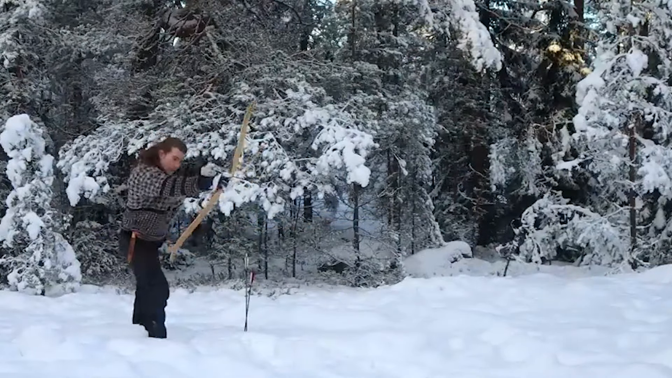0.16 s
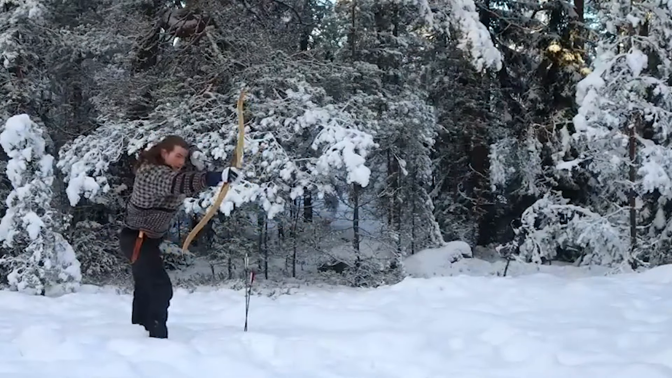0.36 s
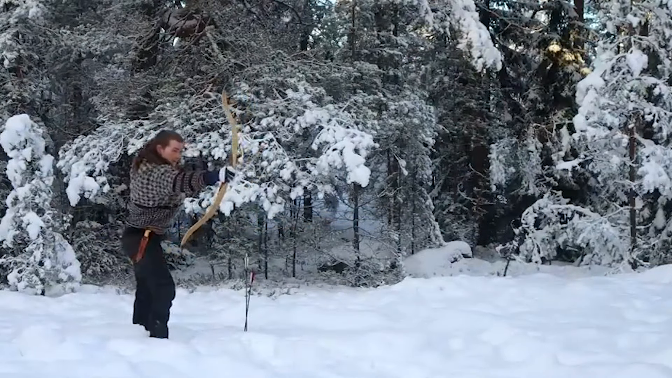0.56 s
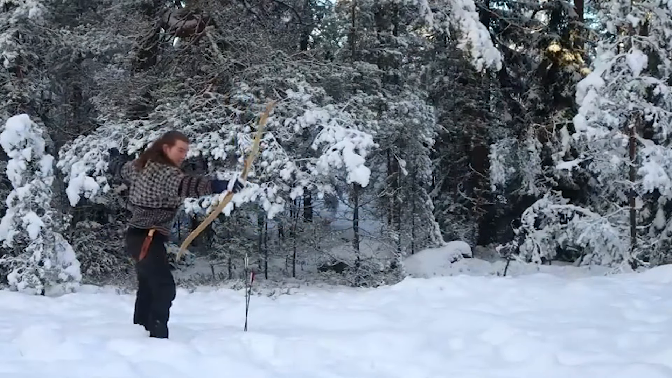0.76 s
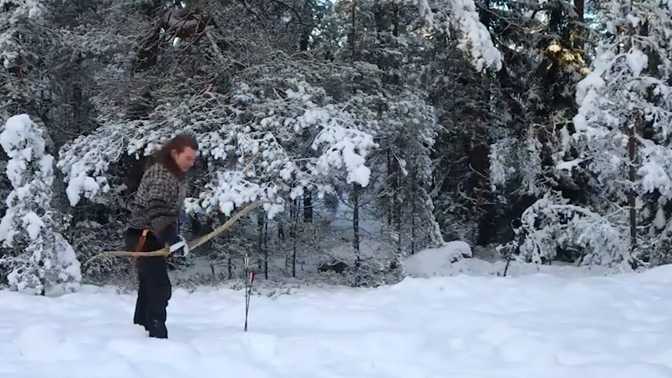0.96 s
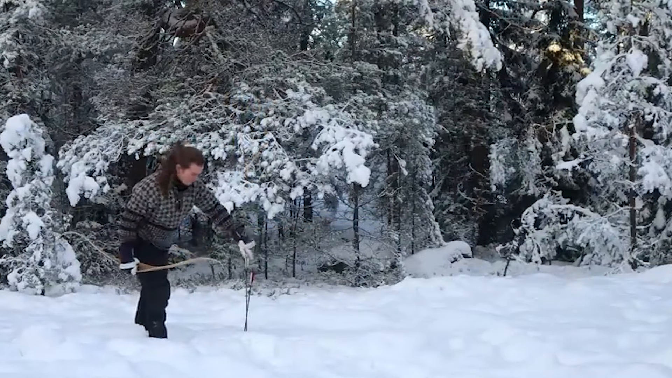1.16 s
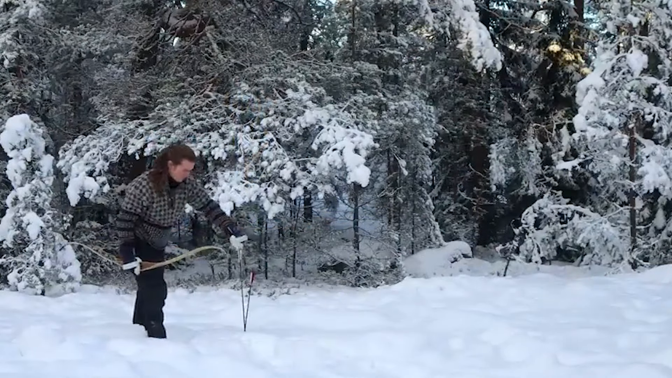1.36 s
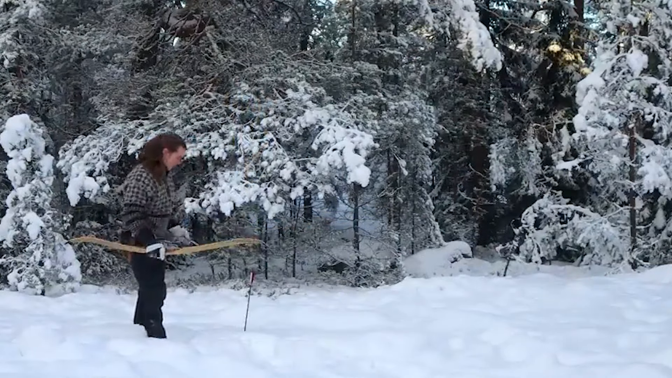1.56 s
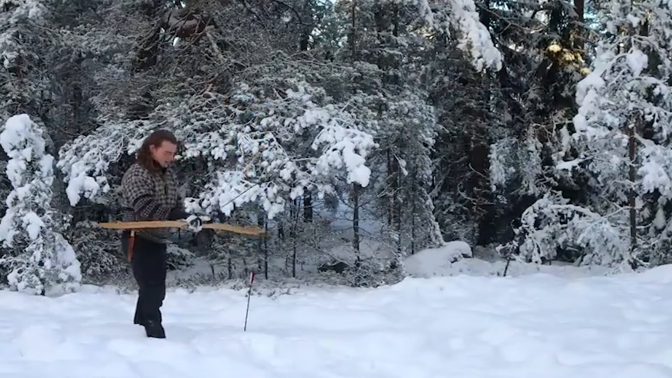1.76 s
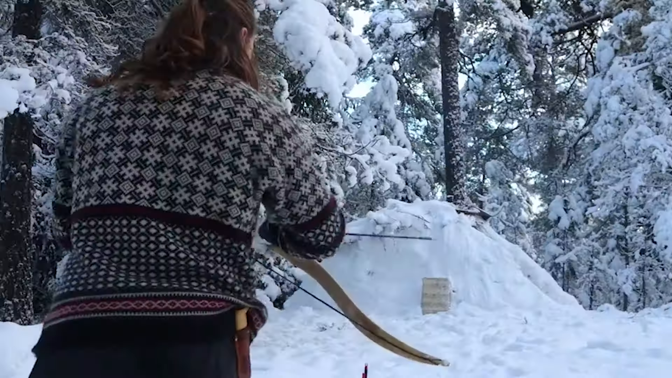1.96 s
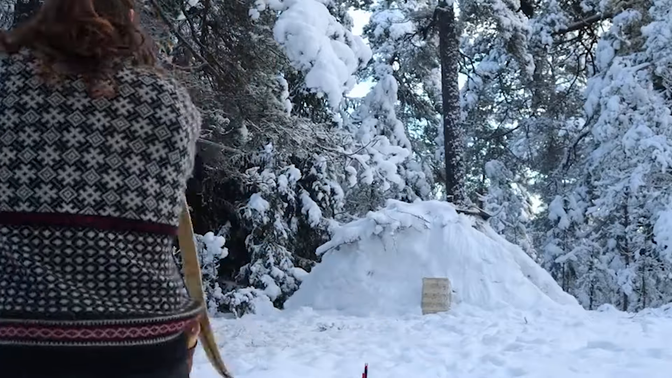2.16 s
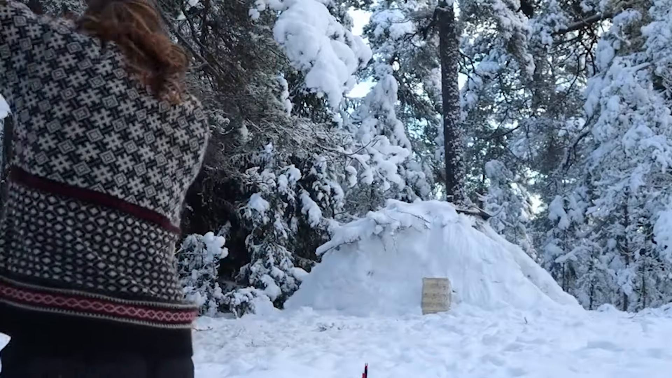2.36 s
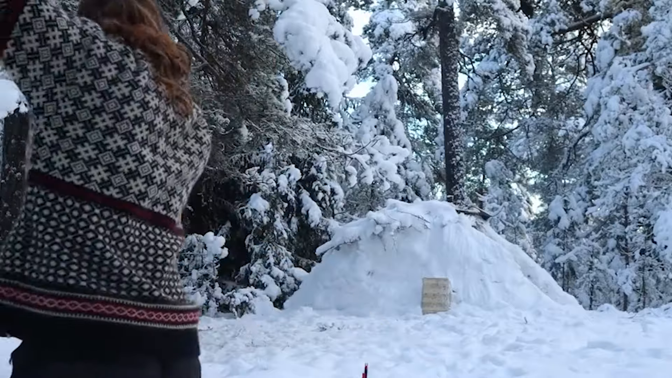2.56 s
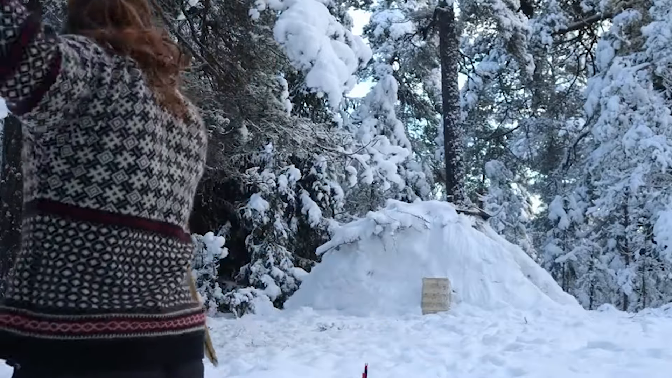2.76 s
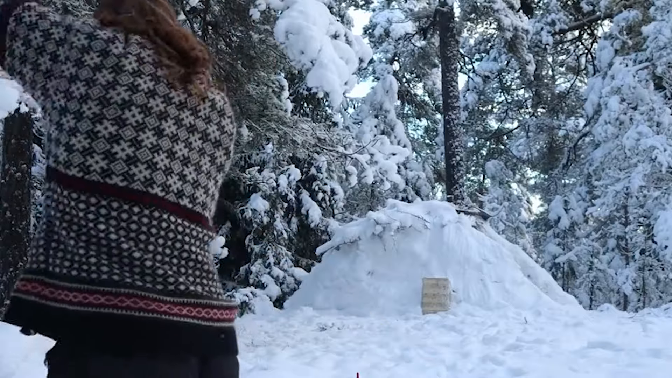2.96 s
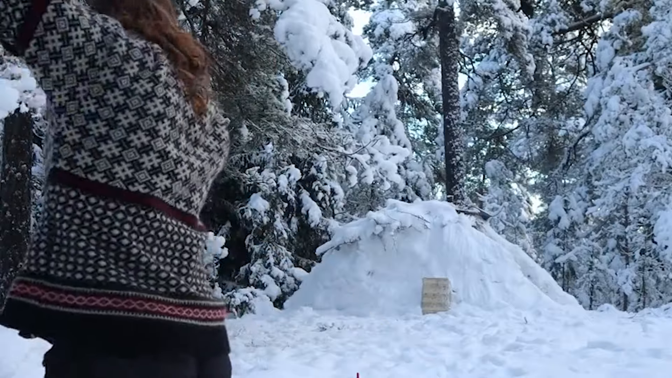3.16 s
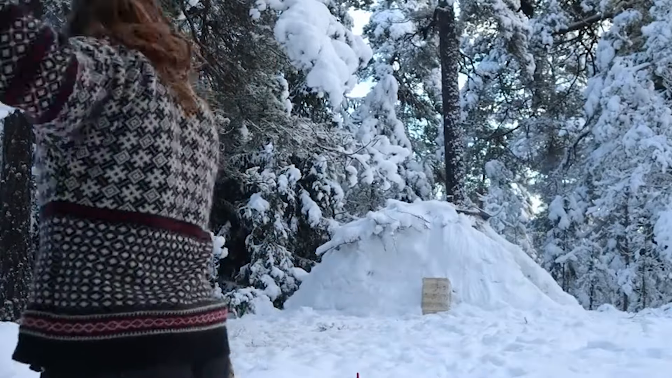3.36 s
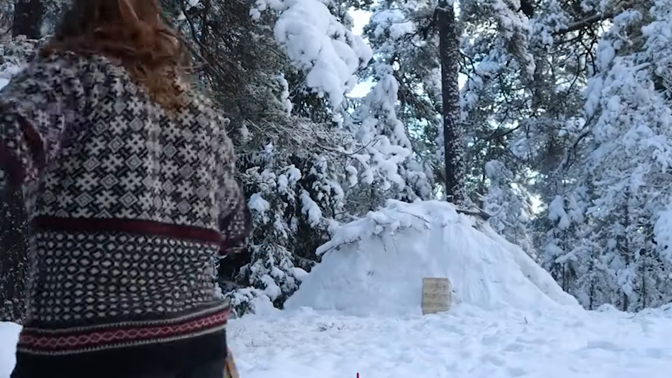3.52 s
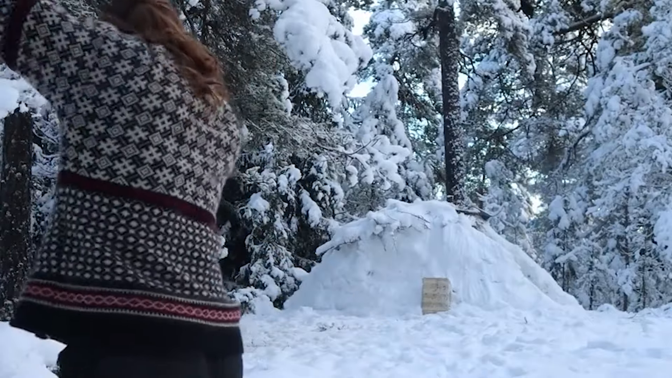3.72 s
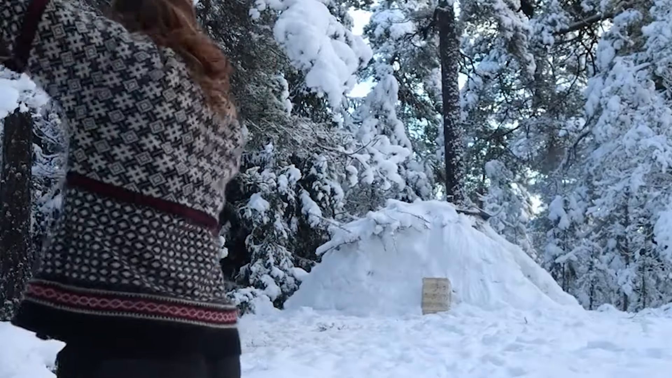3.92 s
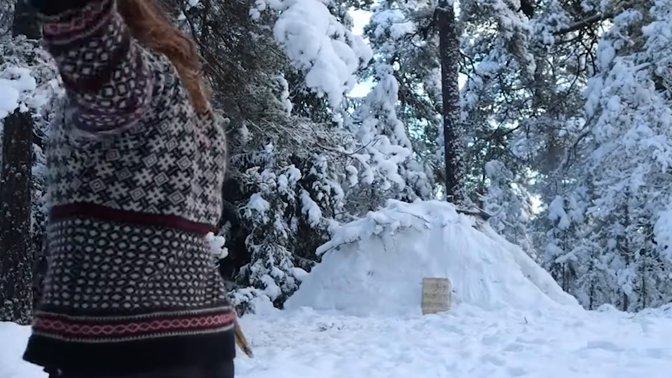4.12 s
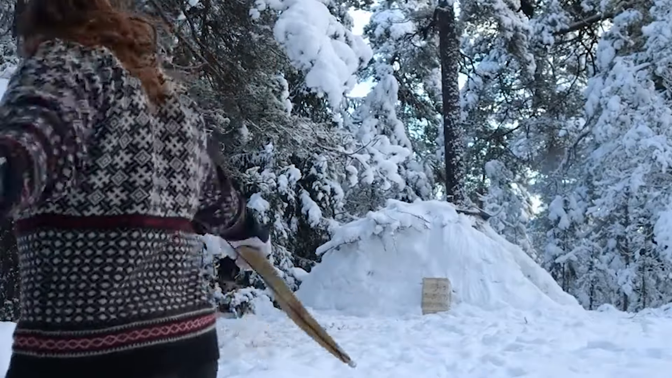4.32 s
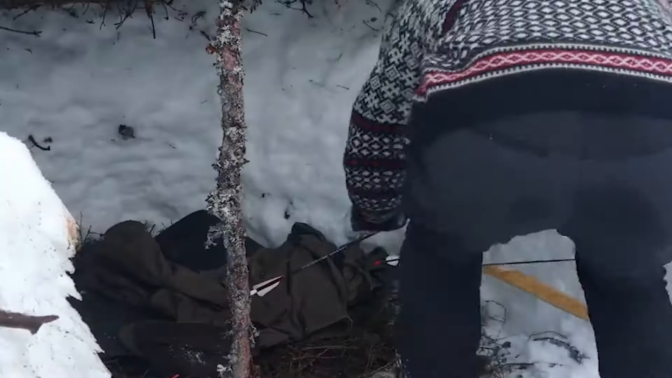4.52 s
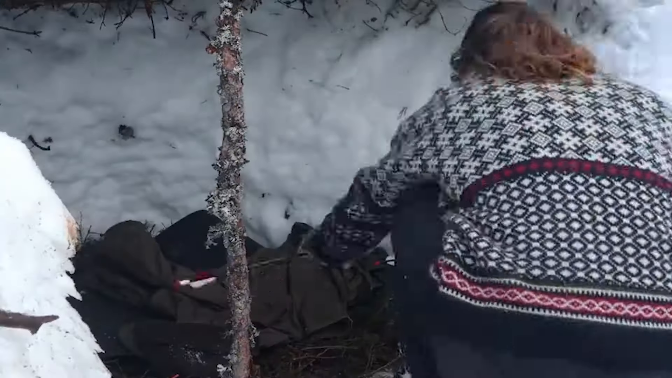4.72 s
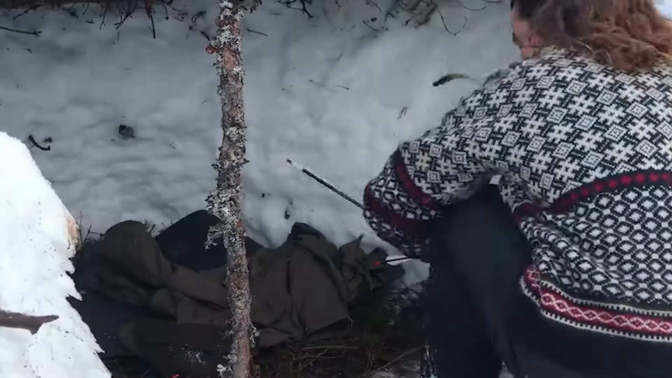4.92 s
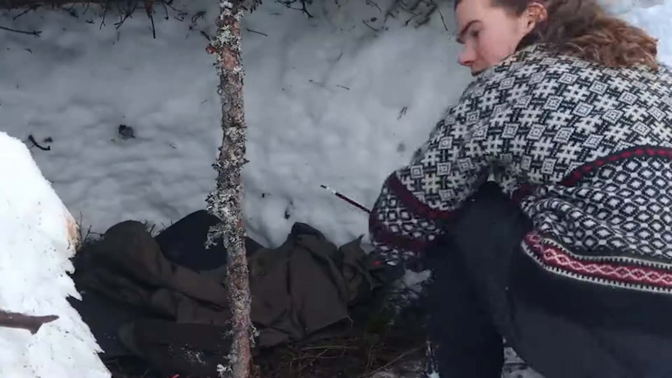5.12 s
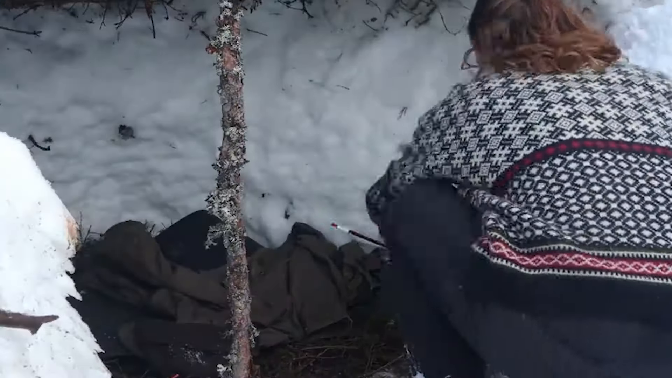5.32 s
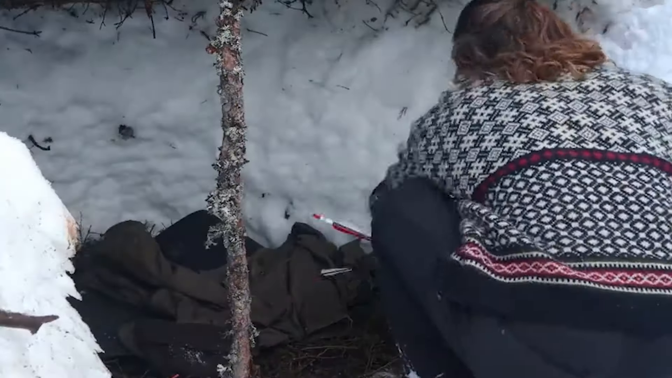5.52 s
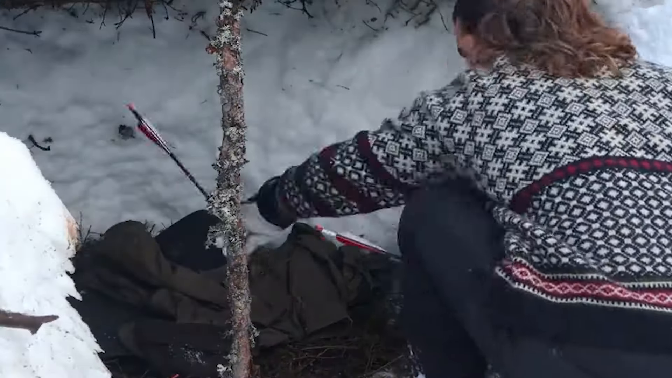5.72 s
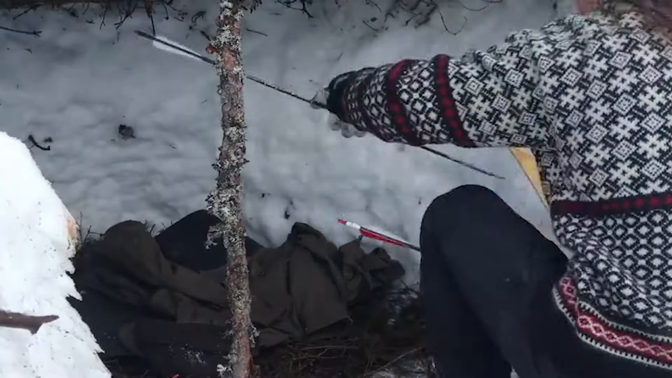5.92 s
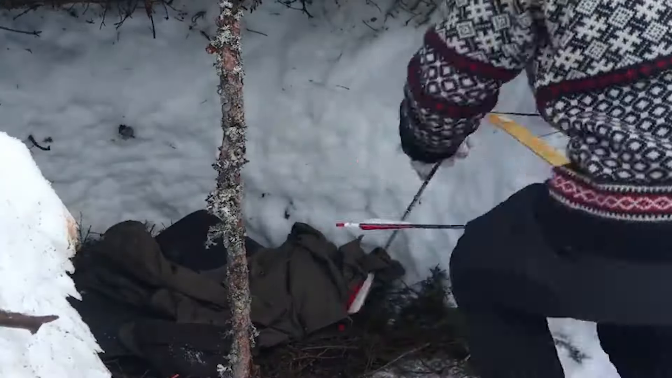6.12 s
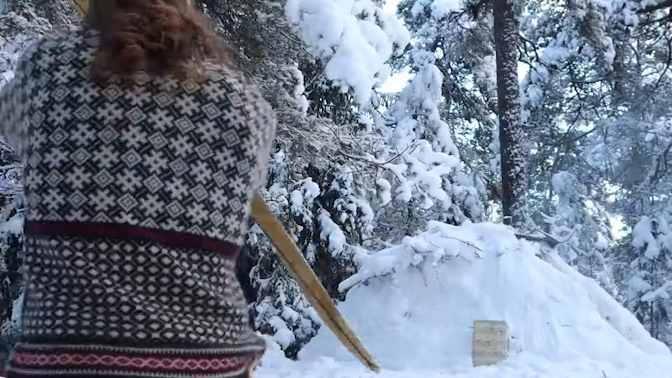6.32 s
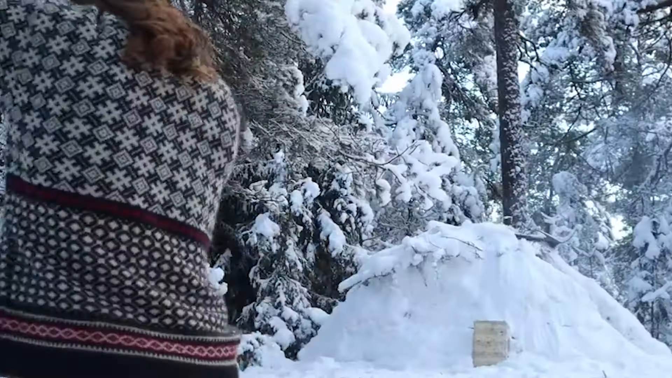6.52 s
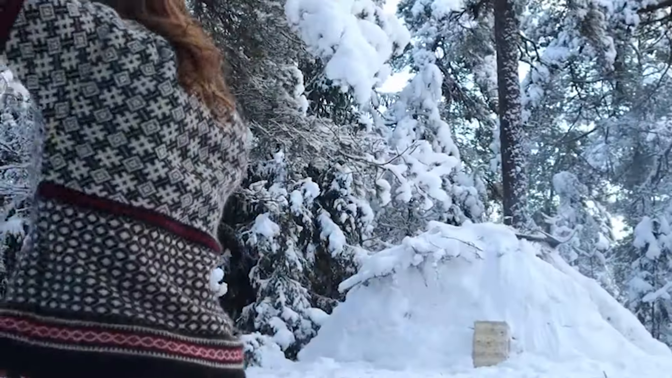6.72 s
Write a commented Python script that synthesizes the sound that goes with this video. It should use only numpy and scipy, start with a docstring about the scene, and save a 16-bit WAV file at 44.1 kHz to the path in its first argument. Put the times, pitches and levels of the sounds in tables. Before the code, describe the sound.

An archer's bow snaps and arrows thud into a target across still snow, broken by close rustling and clacking as shafts are collected.

```python
"""A snowy forest: an archer looses four arrows, the first in a glade, and gathers arrows in a snow shelter.
Each shot is three slaps of noise that leave the modes of the bow ringing; each arrow lands as three
crunches with a dull knock of the target. Sparse random reflections from the trees scatter both back.
Between shots nocks click, shafts clack, wool and snow rustle as grainy noise, and faint low wind
touches the microphone over the still air of each place."""
import sys
import numpy as np
from scipy import signal
from scipy.fft import rfft, irfft, next_fast_len
from scipy.io import wavfile
from scipy.ndimage import uniform_filter1d

SR = 44100
rng = np.random.default_rng(int(sys.argv[2]) if len(sys.argv) > 2 else 0)


def dump_mix(stems):
    """Bounce the given channels to the path in sys.argv[1] as a 16-bit WAV at rate SR."""
    frames = np.atleast_2d(stems).T  # one column per channel
    limited = np.clip(frames, -1, 1)  # hard clip at full scale
    pcm = np.round(limited * 32767).astype(np.int16)
    wavfile.write(sys.argv[1], SR, pcm)


N = 298998
TIME = np.arange(N) / SR

# Where we listen, in order: glade, range, shelter, range. Each row: start in seconds, end in seconds.
PLACE_SPANS = [(0, 1.85), (1.85, 4.385), (4.385, 6.29), (6.29, 7)]


def amp(db):
    """Decibels to gain."""
    return 10 ** (np.asarray(db) / 20)


def unit(x):
    """Scales to rms 1."""
    return x / np.sqrt(np.mean(x ** 2) + 1e-20)


def read(points, hz):
    """Reads a curve of (Hz, value) points on a log-frequency axis."""
    f, value = np.transpose(points)
    return np.interp(np.log(hz + 1), np.log(f + 1), value)


def add(mix, s, sound):
    """Mixes a sound in at time s."""
    part = mix[max(round(s * SR), 0):][:len(sound)]
    part += sound[:len(part)]


def during(start, end):
    """A soft-edged switch that is on between two times."""
    return uniform_filter1d(1. * ((TIME >= start) & (TIME < end)), size=400)


def tilted(points, tilt_db):
    """Leans a spectrum around 1 kHz by so many dB per octave."""
    return [(f, db + tilt_db * np.log2(f / 1000)) for f, db in points]


def hump(hz, db):
    """A spectrum with one broad rise around hz."""
    return [(hz / 2, 0), (hz / 2 ** .5, db / 2), (hz, db), (hz * 2 ** .5, db / 2), (hz * 2, 0)]


def shaped(x, *spectra):
    """Colours a signal by the sum of some dB spectra, with a minimum-phase filter, keeping its energy."""
    size = next_fast_len(len(x) + 2048)
    hz = abs(np.fft.fftfreq(size, 1 / SR))
    gain_db = np.maximum(sum(read(points, hz) for points in spectra), -100)
    log_gain = np.log(amp(gain_db))
    # the Hilbert transform of the log gain gives the phase that puts no sound ahead of its cause
    response = np.exp(np.conj(signal.hilbert(log_gain)))
    y = np.fft.ifft(np.fft.fft(x, size) * response).real
    return y * np.linalg.norm(x) / np.linalg.norm(y)


def noise(spectrum):
    """Steady coloured noise of about rms 1."""
    return shaped(rng.standard_normal(N), spectrum)[:N]


def patchy(x, depth_db):
    """Lets the colour of a noise wander from moment to moment."""
    z = signal.stft(x, SR, nperseg=256)[2]
    field = uniform_filter1d(rng.standard_normal(z.shape), size=7, axis=0)
    field = uniform_filter1d(field, size=5, axis=1)
    return signal.istft(z * amp(depth_db * unit(field)), SR, nperseg=256)[1][:len(x)]


def burst(db, t60, *spectra):
    """A brief dense crunch of contact with a sharp start, even in spectrum before it is coloured."""
    t60 = np.clip(t60, .001, .12)
    t = np.arange(int(t60 * SR)) / SR
    attack = 1 - np.exp(-t / (.012 * t60))
    fade = amp(-60 * t / t60) * attack
    fade_rms = np.sqrt(np.mean(fade ** 2))
    x = rng.standard_normal(SR // 8)[:len(t)]
    # no single pitch stands out of the crunch, and no single sample out of its fade
    for _ in range(3):
        flat = irfft(np.exp(1j * np.angle(rfft(x * fade))), len(t))
        x = np.clip(unit(flat) * fade_rms / (fade + 1e-6), -2, 2)
    return amp(db) * shaped(unit(x * fade) * fade_rms, *spectra)


def ring(modes, tilt_db, rise):
    """Dying modes of a struck body; their starting heights have a joint size of 1."""
    hz, db, t60 = np.transpose(modes)[:, :, None]
    t = np.arange(SR // 3) / SR
    height = amp(db + tilt_db * np.log2(hz))
    phase = 2 * np.pi * (hz * t + rng.random(hz.shape))
    waves = np.sin(phase) * amp(-60 * t / t60)
    onset = 1 - np.exp(-t / rise)
    return (height * waves).sum(0) / np.linalg.norm(height) * onset


def blows(table, colour):
    """Hard contacts, each with its own balance of thump, knock and crack."""
    out = np.zeros(N)
    for s, db, t60, low, knock, mid, top in table:
        balance = [(150, low), (800, knock), (1800, mid), (4200, 0), (11000, top)]
        add(out, s, burst(db, t60, colour, balance))
    return out


def clicks(table, modes, ring_db, tick_db, tick_t60):
    """A tick of contact and the short ring of the part that was hit."""
    # Hard tip on hard shaft. Each row: frequency in Hz, level in dB.
    click_colour = [(100, -39), (900, -38), (1600, -6), (3000, 2.5), (6000, -4), (10000, -6), (16000, -9)]
    out = np.zeros(N)
    for s, db, tilt_db in table:
        add(out, s, amp(db + ring_db) * ring(modes, tilt_db, rise=.0001))
        add(out, s, burst(db + tick_db, tick_t60, tilted(click_colour, tilt_db)))
    return out


def still_air():
    """The quiet of each place is steady noise of its own colour."""
    # Colour of the air in glade, range and shelter. Each row: frequency in Hz, relative level in dB per Hz.
    glade = [(15, -66), (25, -34), (161, -6), (229, -9), (263, -5.5), (545, -7.5), (818, -4.5),
             (1190, -6.5), (1940, -15), (3080, -22), (3720, -23), (8590, -30), (9840, -29.5),
             (10700, -28.5), (16000, -32.5)]
    open_range = [(15, -22), (30, -8), (80, -14.5), (150, -10), (354, -10.5), (575, -8.5), (796, -7),
                  (950, -10.5), (1190, -8), (1700, -11.5), (2610, -13.5), (5880, -19.5), (10100, -24),
                  (16000, -26)]
    shelter = [(15, -53), (25, -31), (80, -15), (195, -2.5), (335, -0.5), (560, -3), (887, -3),
               (1190, -7.5), (1330, -6), (2840, -10), (5570, -8.5), (14800, -14.5), (16000, -14)]
    range_db = -53
    beds = [(glade, -49), (open_range, range_db), (shelter, -49), (open_range, range_db)]
    return sum(during(*span) * amp(db) * noise(colour) for span, (colour, db) in zip(PLACE_SPANS, beds))


def faint_tones():
    """Narrow bands of noise hang in the air as faint tones."""
    # Each row: start in seconds, end in seconds, pitch in Hz, width in Hz, level in dB.
    tone_table = [(0, 1.85, 260, 6, -62), (1.85, 7, 592, 8, -70), (4.385, 7, 1175, 20, -67),
                  (0, 1.85, 9850, 220, -69), (1.85, 7, 9950, 320, -72)]
    out = np.zeros(N)
    bins = np.fft.rfftfreq(N, 1 / SR)
    for start, end, hz, width, db in tone_table:
        band = np.exp(-2 * ((bins - hz) / width) ** 2)
        tone = irfft(rfft(rng.standard_normal(N)) * band, N)
        out += during(start, end) * amp(db) * unit(tone)
    return out


def wind(trim_db=-1):
    """Lumpy low noise of wind at the microphone, heard only on the range."""
    # Strength of the wind in both stays on the range, the first one as a list of stretches.
    # Each row: time in seconds, level in dB before the common trim.
    early_wind = np.vstack([
        [(2.3, -78), (2.424, -61), (2.626, -71), (2.64, -60)],
        [(2.8, -80), (2.91, -48), (2.996, -60), (3.27, -47)],
        [(3.42, -54), (3.446, -58), (3.894, -68), (3.93, -79)],
        [(4.07, -54.5), (4.218, -64), (4.31, -53), (4.38, -63)],
    ])
    late_wind = [(6.3, -61), (6.558, -67), (6.77, -59)]
    # Each row: frequency in Hz, level in dB.
    wind_colour = [(20, -12), (50, -7), (78, -0.5), (105, -5), (150, -4), (230, -11), (400, -31),
                   (1000, -70)]
    gusts = np.zeros(N)
    for curve in (early_wind, late_wind):
        strength = amp(np.interp(TIME, *np.transpose(curve)))
        gusts += during(curve[0][0], curve[-1][0]) * strength
    return amp(trim_db) * gusts * noise(wind_colour)


def forest(x, build_up=0.012, trunks_per_s=5000):
    """Many small reflections from trunks and boughs; the snow soaks them up quickly."""
    # Colour of the echo. Each row: frequency in Hz, level in dB.
    echo_colour = [(100, -13), (400, 0.5), (900, -1), (2000, -1.5), (4000, -4.5), (8000, 1.5),
                   (16000, -0.5)]
    # Decay of the echo. Each row: frequency in Hz, t60 in seconds.
    echo_t60 = [(100, 0.18), (1000, 0.17), (4000, 0.23), (8000, 0.16), (16000, 0.14)]
    t = np.arange(SR // 2) / SR
    reflections = rng.standard_normal(len(t)) * (rng.random(len(t)) < trunks_per_s / SR)
    hz, age, z = signal.stft(reflections, SR, nperseg=256)
    decay_db = 60 * age / read(echo_t60, hz)[:, None]
    z = z * amp(read(echo_colour, hz)[:, None] - decay_db)
    tail = signal.istft(z, SR, nperseg=256)[1][:len(t)]
    tail = tail * (1 - np.exp(-(t / build_up) ** 2))
    return signal.fftconvolve(x, tail / np.linalg.norm(tail))[:N]


def tree_wall(x, delay=0.023, t60=0.18, db=-12, boughs_per_s=2500, build_up=0.0022):
    """In the glade a close wall of spruces returns the strike as a second, later splash."""
    out = np.zeros(N)
    t = np.arange(SR // 4) / SR
    boughs = rng.standard_normal(len(t)) * (rng.random(len(t)) < boughs_per_s / SR)
    colour = [(150, -6), (380, 1), (800, -21), (1500, -1), (3100, 3.5), (3750, 9.5),
              (4400, -1.5), (6500, -2.5), (16000, 3)]  # (Hz, dB)
    scatter = shaped(boughs * amp(-60 * t / t60) * (1 - np.exp(-t / build_up)), colour)
    in_glade = x * during(*PLACE_SPANS[0])
    add(out, delay, signal.fftconvolve(in_glade, scatter / np.linalg.norm(scatter)))
    return amp(db) * out


def rubbing(grains_per_s=1200, spread_db=3.0, smooth_share=0.89, clump_db=2):
    """Sleeve, arrow or snow strokes: fibres and ice grains slip in clumps over a soft hiss."""
    # Each row: start in seconds, length in seconds, level in dB midway through the swell,
    # swell from start to end in dB, tilt in dB per octave.
    strokes = [(0.249, .3, -59, 14, -1.5), (2.041, 0.16, -43, -8, -4.5), (2.233, 0.15, -45, -11.5, -3),
               (2.484, 0.041, -51, -2, -3), (3.063, 0.11, -54.5, -11, -2), (3.617, .23, -58, 17, -4.5),
               (4.383, 0.03, -34, -7, -1.5), (4.421, 0.061, -36, 14, 1.5), (4.54, 0.091, -31.5, 4.5, 0),
               (4.641, .045, -31.5, -6, 0.5), (4.722, 0.022, -44.5, 3, 1), (4.812, 0.027, -43, 7, -1),
               (4.852, 0.039, -36, -5, 1), (5.018, 0.017, -40.5, 0, -2), (5.3, 0.048, -39, -7, -.5),
               (5.467, 0.042, -41.5, 7, 3), (5.651, 0.042, -36.5, 10, 2.5), (5.951, 0.021, -39.5, 9, -2.5),
               (6.008, 0.083, -33.5, -6, -1), (6.13, 0.081, -45.5, -10, -0.5),
               (6.22, 0.014, -30.5, -7, -1.5), (6.265, 0.14, -39, -2.5, -4),
               (6.43, 0.095, -45.5, -3.5, -3.5)]
    # Each row: frequency in Hz, level in dB.
    rub_colour = [(59, -54), (100, -31.5), (471, -11), (691, -6.5), (1030, -4), (1680, -4), (2170, -3.5),
                  (3540, -3), (3940, 0), (14400, -8), (16000, -15)]
    attack_s, release_t60 = 0.0098, 0.066
    sizes = amp(spread_db * np.minimum(rng.exponential(1, N), 5)) * rng.choice([-1, 1], N)
    grains = unit(sizes * (rng.random(N) < grains_per_s / SR))
    hiss = smooth_share * rng.standard_normal(N)
    clumps = amp(clump_db * unit(uniform_filter1d(rng.standard_normal(N), size=200)))
    friction = unit(patchy((grains + hiss) * clumps, depth_db=3))
    out = np.zeros(N)
    for start, length, db, swell_db, tilt_db in strokes:
        stroke = friction[int(start * SR):][:int((length + release_t60) * SR)]
        t = TIME[:len(stroke)]
        attack = np.minimum(t / attack_s, 1)
        swell = amp(db + swell_db * (np.minimum(t / length, 1) - .5))
        release = amp(-60 * np.maximum(t - length, 0) / release_t60)
        add(out, start, shaped(stroke * attack * swell * release, tilted(rub_colour, tilt_db)))
    return out


def bumps(thud_t60=0.032, thud_tilt_db=-3, spread_db=4, body_hz=650, body_db=4):
    """Dull contacts of glove, bow and boot that do not ring, and softer thuds of packing snow."""
    # Each row: time in seconds, level in dB, tilt in dB per octave.
    bump_table = [(2.052, -29.5, -1), (2.176, -32, -1.5), (2.229, -32, 2.5), (2.246, -29, 4),
                  (2.353, -30, 1), (2.875, -30, -1), (3.648, -35, 2.5), (4.534, -26.5, 1.5),
                  (6.425, -29, -1), (6.464, -27, 0), (6.658, -30.5, 1)]
    # Spells of soft thuds as the archer shifts in the snow.
    # Each row: start in seconds, end in seconds, middle level in dB.
    shuffles = [(2.079, 2.443, -42), (5.097, 5.45, -39), (5.699, 6.25, -40), (6.383, 6.552, -38)]
    # Each row: frequency in Hz, level in dB.
    bump_colour = [(50, -21.5), (200, -3), (500, 3.5), (1200, 0.5), (2500, -5), (6000, -13.5),
                   (16000, -26.5)]
    bump_t60, thuds_per_s = .023, 21
    out = np.zeros(N)
    for s, db, tilt_db in bump_table:
        add(out, s, burst(db, bump_t60, tilted(bump_colour, tilt_db), hump(body_hz, body_db)))
    thud_colour = tilted(bump_colour, thud_tilt_db)
    for start, end, db in shuffles:
        count = round((end - start) * thuds_per_s)
        for when, size, pitch in rng.random((40, 3))[:count]:
            body = hump(220 * 2 ** (2 * pitch), 7.3)
            level_db = db + spread_db * (2 * size - 1)
            add(out, start + when * (end - start), burst(level_db, thud_t60, thud_colour, body))
    return out


def snaps(body_db=10, tick_db=12, spread_db=4, tick_t60=0.0049, scrape_db=24):
    """Small things break or slip, each around its own pitch; many faint ticks fall at random."""
    # Twigs, snow crust and small hard parts snap.
    # Each row: time in seconds, level in dB, t60 in seconds, strongest pitch in Hz.
    snap_table = [(1.6125, -33.5, 0.0056, 10860), (3.6262, -30, 0.016, 5440), (4.3985, -11, 0.0024, 3500),
                  (4.4051, -6, 0.003, 4580), (4.4863, -13, 0.019, 8600), (4.502, -18, .0056, 4000),
                  (4.526, -31, .008, 7000), (4.5919, -6, 0.0015, 3600), (4.647, -23, 0.0077, 4340),
                  (4.664, -15.5, 0.011, 10930), (4.7618, -21.5, .008, 10000), (4.9917, -27, 0.0056, 5000),
                  (5.028, -24, 0.0059, 4900), (5.0765, -26.5, 0.012, 2400), (5.264, -20.5, 0.0034, 2810),
                  (5.3205, -8, 0.0025, 2700), (5.621, -29, 0.013, 7070), (5.969, -23, .017, 11000),
                  (6.0226, -10.5, 0.015, 5600), (6.0282, -12, 0.015, 1070), (6.1383, -17, .0028, 3700),
                  (6.2188, -18, 0.0075, 7610)]
    # A shaft chatters or sings briefly as it slides.
    # Each row: time in seconds, level in dB, t60 in seconds, pitch in Hz.
    scrapes = [(5.698, -33, 0.037, 10670), (5.737, -32, 0.057, 10500), (6.015, -24, 0.042, 1170),
               (6.274, -24, 0.034, 2850)]
    # Spells of small ticks from wool, string and needles.
    # Each row: start in seconds, end in seconds, typical level in dB.
    fidgets = [(0.124, .56, -45), (1.385, 1.547, -40.5), (2.039, 2.376, -44), (3.602, 3.856, -45.5),
               (4.422, 4.7, -30), (4.7, 5.961, -38.5), (6.002, 6.42, -33.5)]
    # Each row: frequency in Hz, level in dB.
    snap_colour = [(100, -24), (500, -10), (1200, -0.5), (2500, -0.5), (5000, 2), (8000, -3.5),
                   (16000, -10)]
    ticks_per_s = 63
    out = np.zeros(N)
    for s, db, t60, hz in snap_table:
        add(out, s, burst(db, t60, snap_colour, hump(hz, body_db)))
    for s, db, t60, hz in scrapes:
        add(out, s, burst(db, t60, snap_colour, hump(hz, scrape_db)))
    for start, end, db in fidgets:
        count = round((end - start) * ticks_per_s)
        for when, size, pitch in rng.random((100, 3))[:count]:
            hz = 1800 * 2 ** (2.4 * pitch)
            # few ticks are loud, most are faint
            level_db = db + spread_db * (min(-np.log(size), 3) - 1)
            add(out, start + when * (end - start), burst(level_db, tick_t60, snap_colour, hump(hz, tick_db)))
    return out


def clacking():
    """Arrow shafts knock together and ring; thin shafts radiate little bass."""
    # Each row: time in seconds, level in dB, tilt in dB per octave.
    clacks = [(5.109, -36, 5), (5.1141, -10.5, 1), (5.1168, -13.5, 1.5)]
    # Ringing of the knocked shafts. Each row: frequency in Hz, relative level in dB, t60 in seconds.
    shaft_modes = [(1546, -4, .038), (1870, -11, .036), (2150, -10, .02), (2697, -4, .034),
                   (3190, -8, .022), (3553, -8, .038), (4204, -7, .038), (4630, -14, .04), (5023, -14, .04),
                   (5660, -4, .032), (6600, -8, .029), (7790, -6, .034), (10740, -14, .032)]
    # Radiation of a thin shaft. Each row: frequency in Hz, level in dB.
    thin_shaft = [(60, -24), (500, -8), (1300, -1.5), (16000, 0)]
    knocks = clicks(clacks, shaft_modes, ring_db=-1, tick_db=0, tick_t60=.018)
    return shaped(knocks, thin_shaft)[:N]


def nocking():
    """The nock touches the string, lighter and duller, then snaps home."""
    # Each row: time of the snap in seconds, level in dB, tilt in dB per octave, touch earlier by seconds.
    nocks = [(2.2775, -15.5, 5, .0122), (2.9078, -14, 7, .011), (3.5899, -15.5, 5, 0.014),
             (6.2518, -11, 4, 0.019), (6.493, -8.5, 9.5, 0.014)]
    # Ringing of the nock. Each row: frequency in Hz, relative level in dB, t60 in seconds.
    nock_modes = [(3020, -19, .02), (4280, -11, 0.071), (4570, -8.5, 0.057), (5690, -3, 0.026),
                  (6570, -1, 0.032), (7000, 0, 0.016), (9260, 5.5, 0.012), (11320, -1.5, 0.0054),
                  (13400, -0.5, 0.012), (15100, -11, 0.013)]
    touch_db, touch_tilt_db = -9, -1.5  # relative to the snap
    touches = [(s - early_s, db + touch_db, tilt_db + touch_tilt_db) for s, db, tilt_db, early_s in nocks]
    homes = [row[:3] for row in nocks]
    return clicks(touches + homes, nock_modes, ring_db=-3.0, tick_db=-6.0, tick_t60=.01)


def arrows(knock_share=0.36):
    """Each arrow cracks, drives in and stops; a heavier hit is deeper and knocks and rocks the target more."""
    # Each row: time in seconds, time until it stops in seconds, tip, shaft, stop and weight in dB,
    # length of the crunch as a factor.
    hits = [(0.7107, 0.0054, -9, -7, -7, 7, 1.98), (2.7294, 0.0065, 1, -8.5, -6.5, -7, 0.68),
            (3.3432, .0058, -7, -4, -11, 4.5, 1.02), (4.0212, 0.0038, -6.5, -8.5, -29, -6, 1.13)]
    # The tip cracks, the shaft drives in, the arrow stops. Each row: share of the stopping time,
    # t60 in seconds before the factor, colour in dB at 150 Hz, 800 Hz, 1800 Hz and 11 kHz before the weight.
    stages = [(0, .009, -1, -2, -6.5, 2), (.47, .011, 4, 1.5, 4.5, -1.5), (1, 0.013, 4, 11.5, 2, 3.5)]
    # Dull knock of the target. Each row: frequency in Hz, relative level in dB, t60 in seconds.
    board_modes = [(264.5, -2, 0.067), (370, 3.5, 0.082), (570, -9, 0.071), (774, -5, .03), (1070, 3, 0.04)]
    # Colours of the strike and of the target rocking back. Each row: frequency in Hz, level in dB.
    strike_colour = [(20, -20), (90, -31.5), (250, -9), (500, -10.5), (900, 0), (1400, -9), (2200, -2.5),
                     (3000, -3), (4200, 5.5), (6000, -3), (9500, -7.5), (16000, -14.5)]
    rebound_colour = [(150, 14), (500, 23), (800, 18), (1800, 2), (4200, -5), (11000, -1)]
    board_db = -30.5  # before the weight
    rebound_s, rebound_db, rebound_t60 = .0205, -33, 0.022
    out, contacts = np.zeros(N), []
    for s, stop_s, tip_db, shaft_db, stop_db, weight_db, crunch in hits:
        for db, stage in zip([tip_db, shaft_db, stop_db], stages):
            share, t60, low, knock, mid, top = stage
            low, knock = low + weight_db, knock + knock_share * weight_db
            contacts.append((s + share * stop_s, db, t60 * crunch, low, knock, mid, top))
        add(out, s + stop_s, amp(board_db + weight_db) * ring(board_modes, 0, rise=.001))
        rebound = burst(rebound_db + weight_db, rebound_t60, strike_colour, rebound_colour)
        add(out, s + rebound_s, rebound)
    return out + blows(contacts, strike_colour)


def bow(rush_t60=0.023, rush_db=-39):
    """The string rushes forward, slaps three times and leaves the bow ringing as it stops."""
    # The string is let go. Each row: time in seconds, time until it stops in seconds, slap level in dB,
    # extra for the first slap in dB, edge in dB, bow ring in dB, ring tilt in dB per octave,
    # lift of the mode near 1.7 kHz in dB, ring time as a factor set by the grip.
    looses = [(.662, 0.0053, -0.5, -6.5, 8, -11.5, 3.5, 13, 0.9),
              (2.6693, 0.0091, -0.5, 2, 0.5, -5, 1.5, 3.5, .94),
              (3.2842, .0088, 0, 0, 0, -4.5, -0.5, 2.5, 0.89),
              (3.9606, 0.0085, 0.5, 0.5, 1.5, -7, -1, 6.5, 0.9)]
    # The three slaps. Each row: share of the stopping time, relative level in dB, t60 in seconds,
    # colour in dB at 150 Hz, 800 Hz, 1800 Hz and 11 kHz before the edge is added.
    stages = [(0, -7.5, 0.012, -12, 4, -5, -5), (.57, -4.5, 0.016, -6.5, 9.5, 6.5, 1.5),
              (1, -12.5, 0.028, 7, -7.5, -0.5, 6.5)]
    # Modes of the bow. Each row: frequency in Hz, relative level in dB, t60 in seconds before the grip.
    bow_modes = [(149.3, -15.5, 0.04), (366, -11, 0.067), (680, -21.5, 0.24), (891, 0.5, 0.098),
                 (1010, -15, 0.21), (1440, -2.5, 0.027), (1680, -6.5, 0.068), (1920, -22.5, 0.094),
                 (2040, -3.5, 0.029), (2600, -10.5, 0.098), (3380, -23, .04), (3630, -5, 0.051),
                 (3880, -19, .045), (4160, -0.5, 0.037), (4900, -10, 0.042), (5460, -20, .055),
                 (6450, -6, 0.037), (8130, -26, .04)]
    # Each row: frequency in Hz, level in dB.
    slap_colour = [(20, -24), (70, -15), (150, -7.5), (230, -15.5), (400, -3.5), (900, -9), (1600, 2),
                   (3000, 0.5), (4500, 0), (6500, -3), (10000, -10.5), (16000, -20)]
    out, slaps = np.zeros(N), []
    time_left = np.arange(int(rush_t60 * SR))[::-1] / SR
    for s, stop_s, db, first_db, edge_db, ring_db, tilt_db, lift_db, grip in looses:
        swell = amp(rush_db - 60 * time_left / rush_t60)
        rush = shaped(swell * rng.standard_normal(len(time_left)), slap_colour)
        add(out, s - rush_t60, rush)
        for k, (share, level, t60, low, knock, mid, top) in enumerate(stages):
            slap_db = db + level + first_db * (k == 0)
            # more edge trades knock for crack
            slaps.append((s + share * stop_s, slap_db, t60, low, knock - edge_db, mid, top + edge_db))
        modes = [(hz, level + lift_db * (1600 < hz < 1770), t60 * grip) for hz, level, t60 in bow_modes]
        add(out, s + stop_s, amp(ring_db) * ring(modes, tilt_db, rise=0.00075))
    return out + blows(slaps, slap_colour)


def scene():
    """Air, echoes, handling and shots, in one channel."""
    # how strongly the trees return the bow, the hit and the handling, and how much more the shot in the glade
    bow_echo_db, hit_echo_db, handling_echo_db, glade_echo_db = -16, -18.5, -33, 4
    hits, releases = arrows(), bow()
    send = amp(bow_echo_db) * releases + amp(hit_echo_db) * hits
    send = send * amp(glade_echo_db * during(*PLACE_SPANS[0]))
    background = still_air() + faint_tones() + wind() + tree_wall(hits) + forest(send)
    handling = clacking() + nocking() + rubbing() + bumps() + snaps()
    handling_echo = amp(handling_echo_db) * forest(handling)
    return (background + handling + handling_echo + hits + releases)[None]


def record(dry):
    """The loudest peaks are rounded off, then the treble is cut at the band limit."""
    edge_hz = 16000
    rounded = dry / (1 + (dry / .95) ** 4) ** (1 / 4)
    band_limit = signal.firwin(255, edge_hz, window=("kaiser", 8), fs=SR)
    return signal.oaconvolve(rounded, band_limit[None], "same")


dry = scene()
out = record(dry)
dump_mix(out)
```